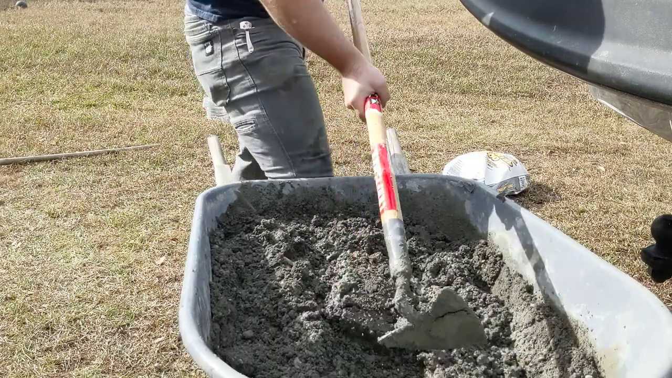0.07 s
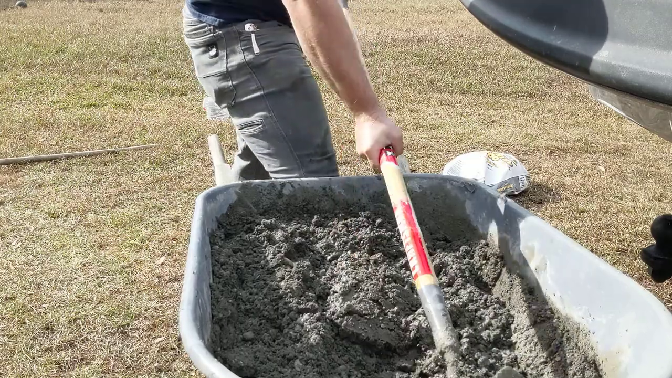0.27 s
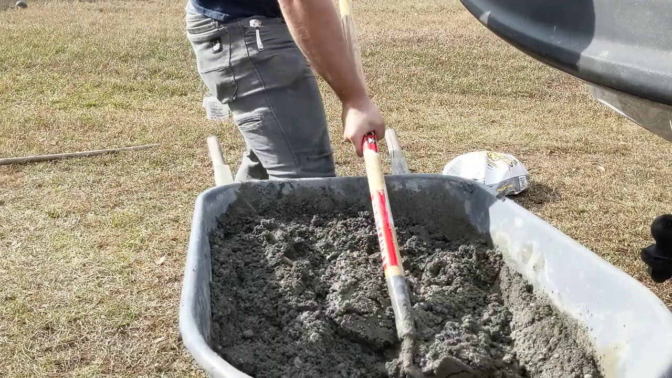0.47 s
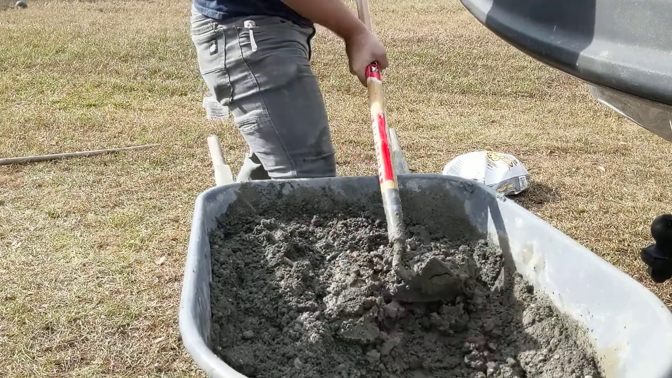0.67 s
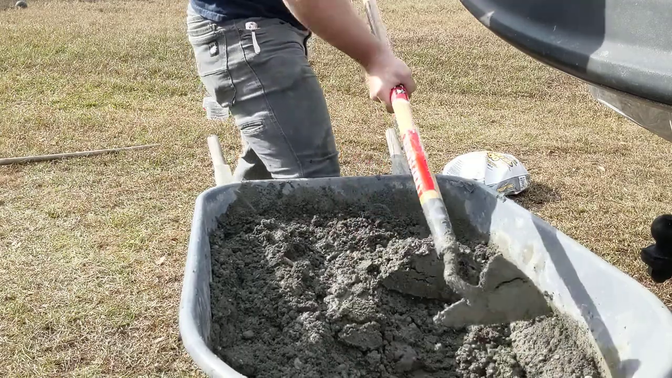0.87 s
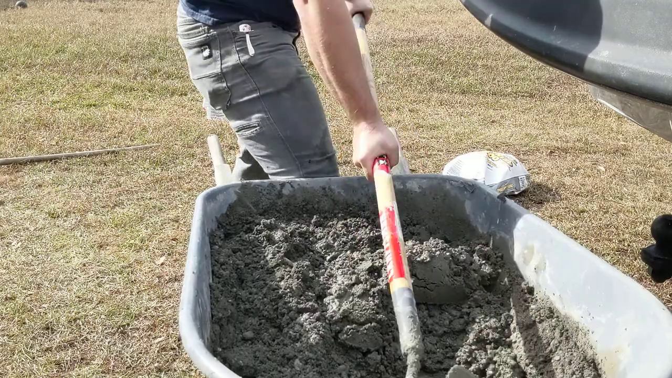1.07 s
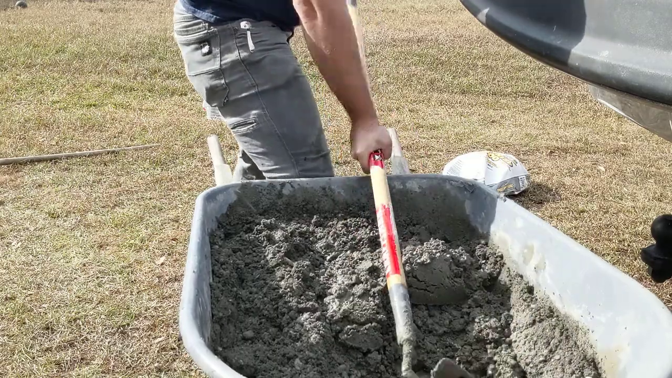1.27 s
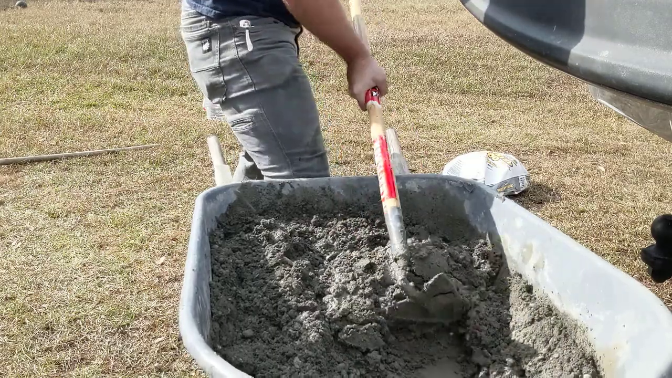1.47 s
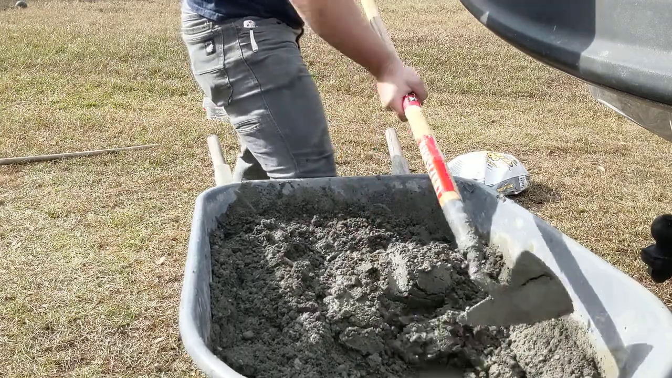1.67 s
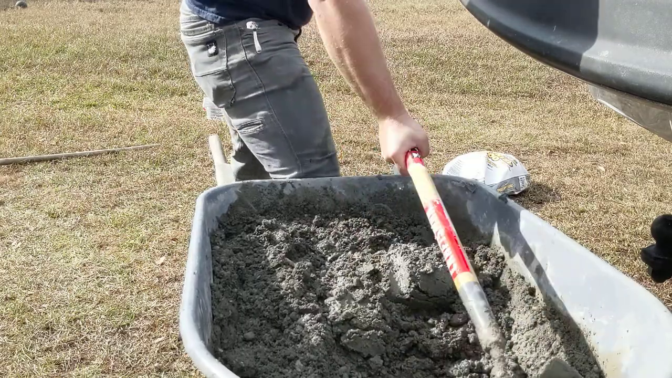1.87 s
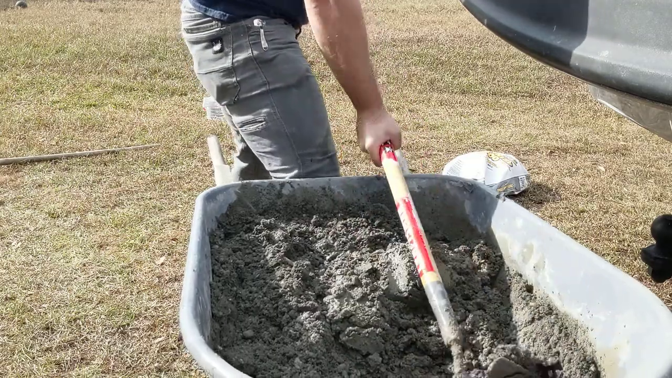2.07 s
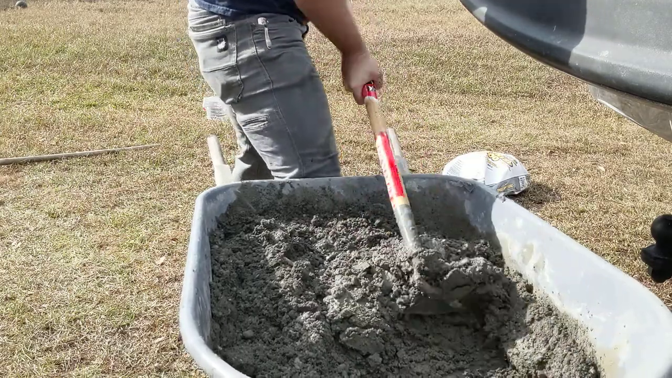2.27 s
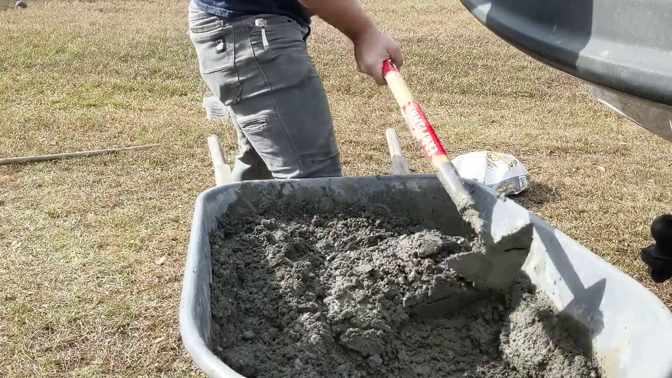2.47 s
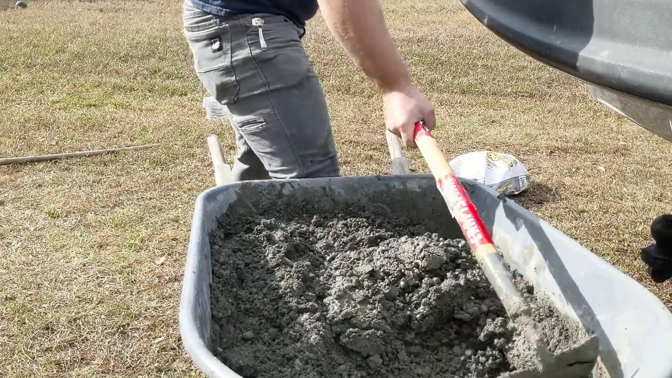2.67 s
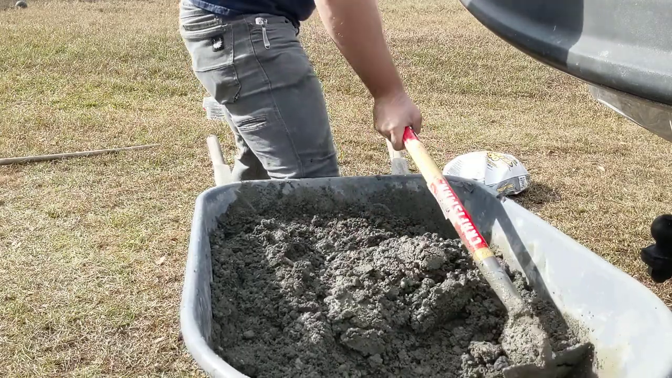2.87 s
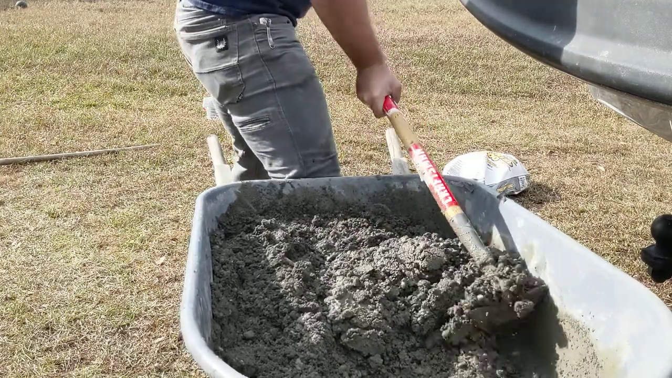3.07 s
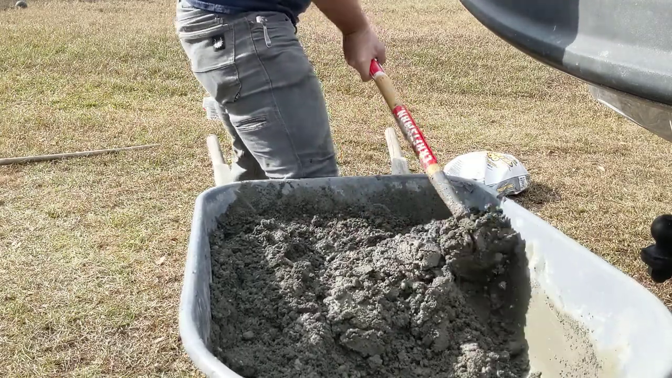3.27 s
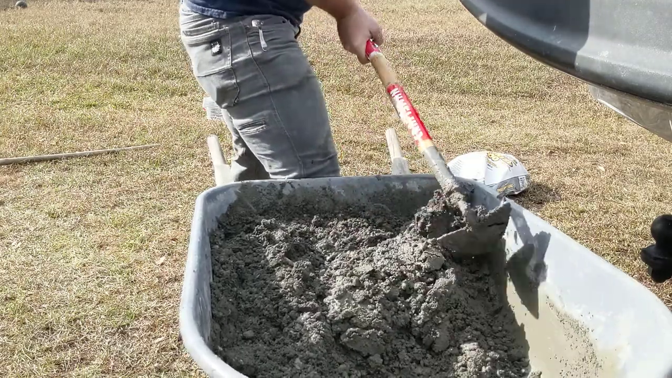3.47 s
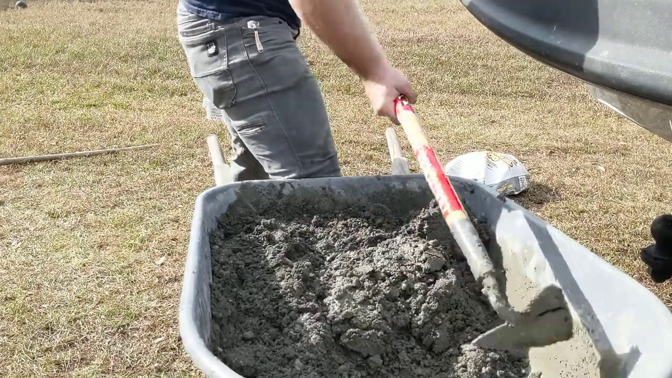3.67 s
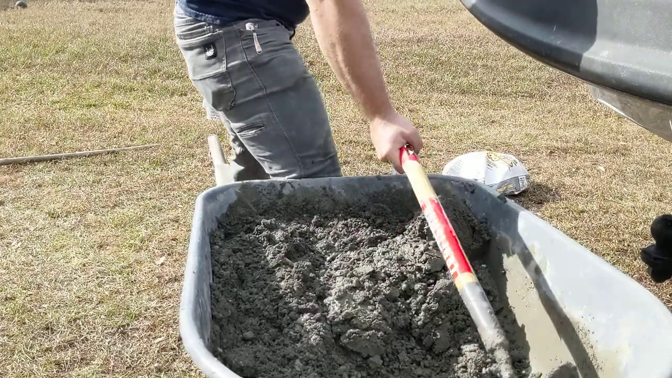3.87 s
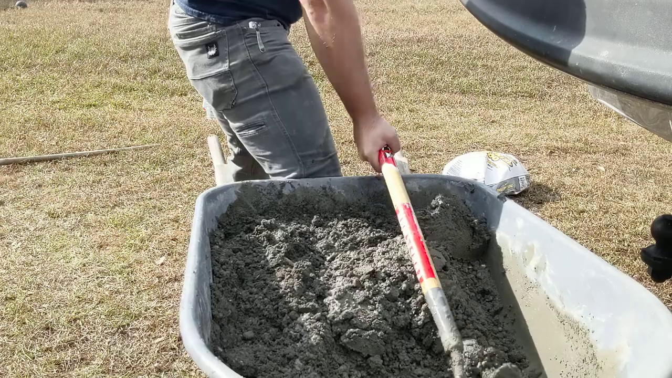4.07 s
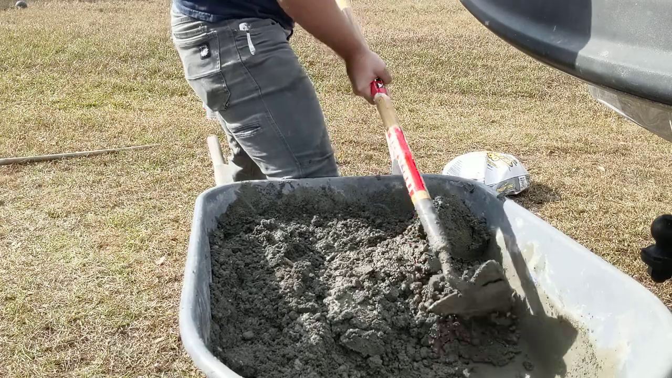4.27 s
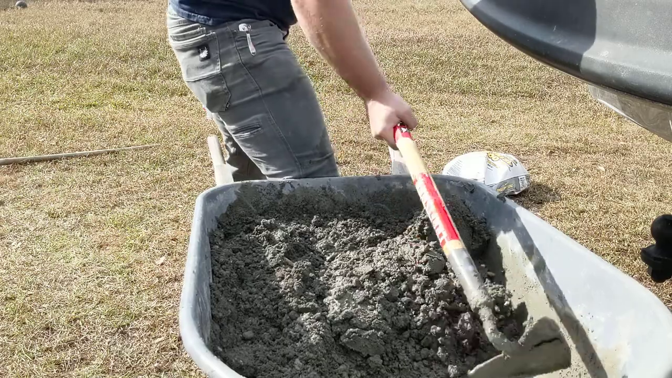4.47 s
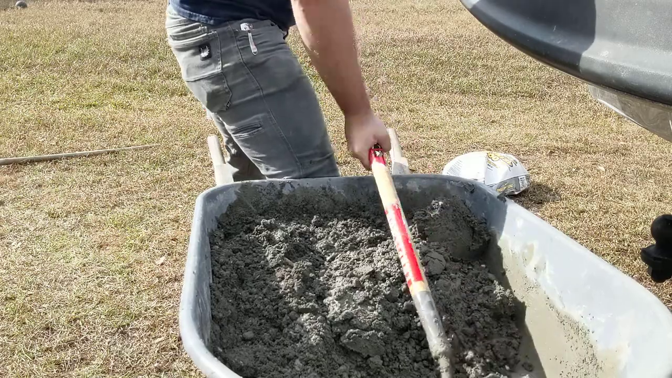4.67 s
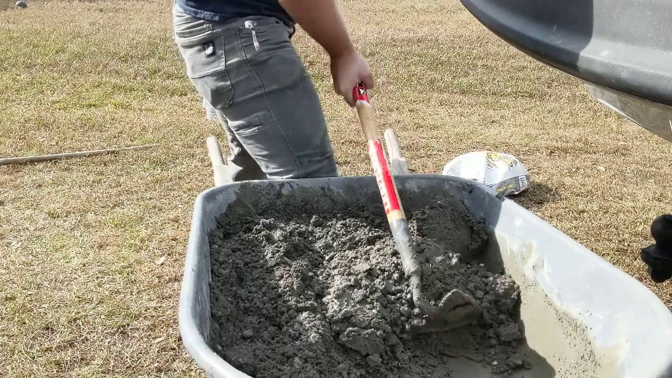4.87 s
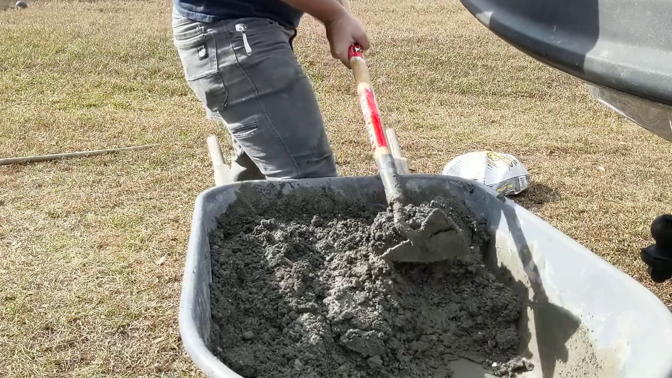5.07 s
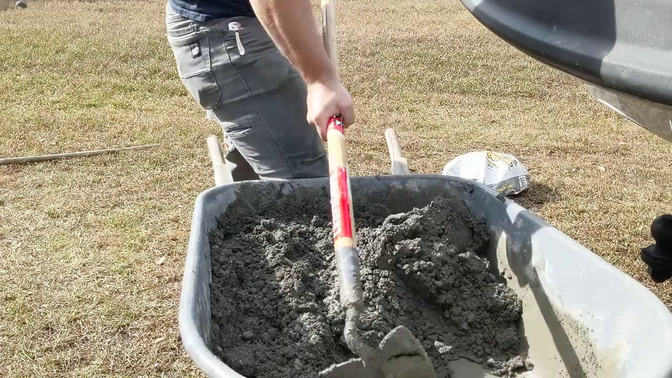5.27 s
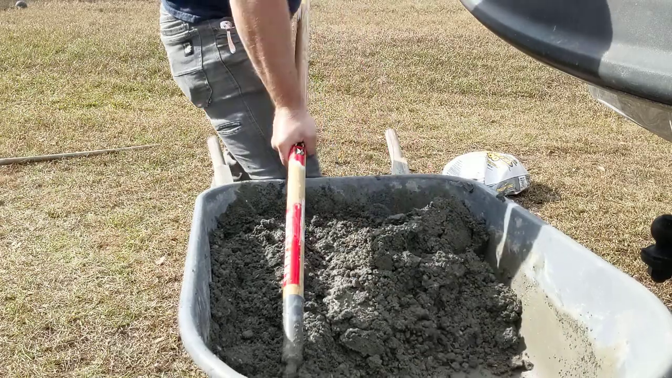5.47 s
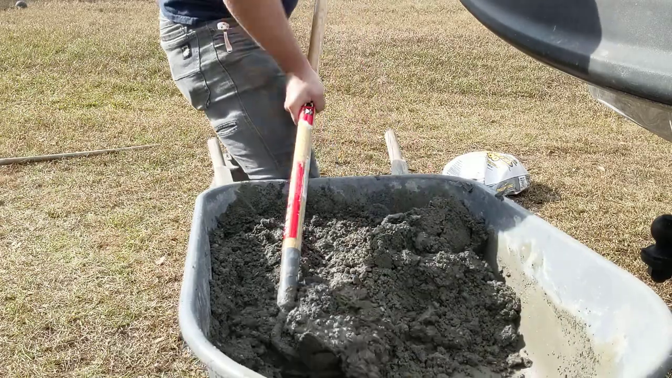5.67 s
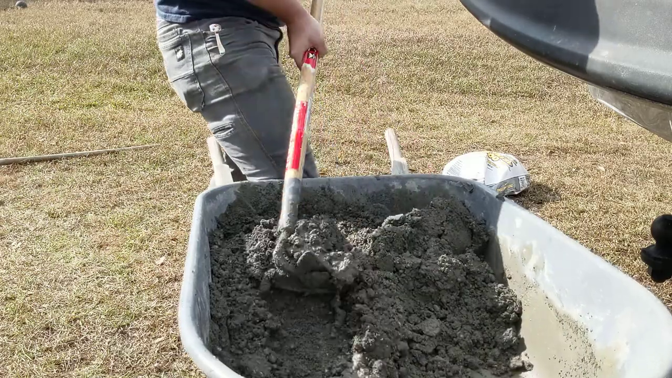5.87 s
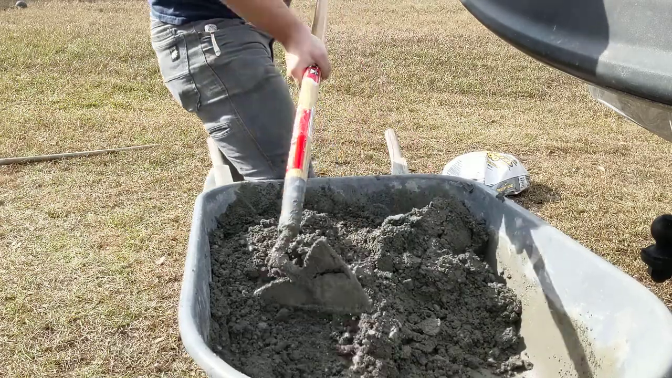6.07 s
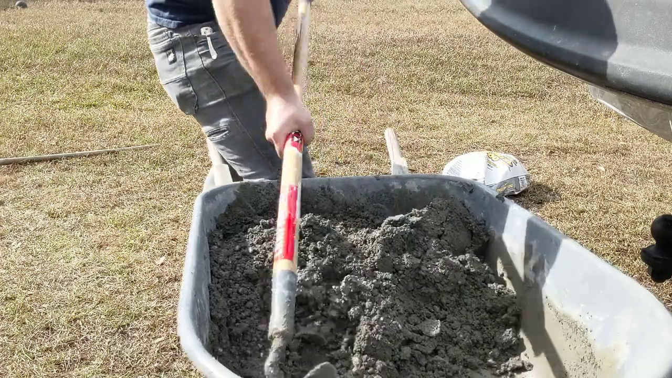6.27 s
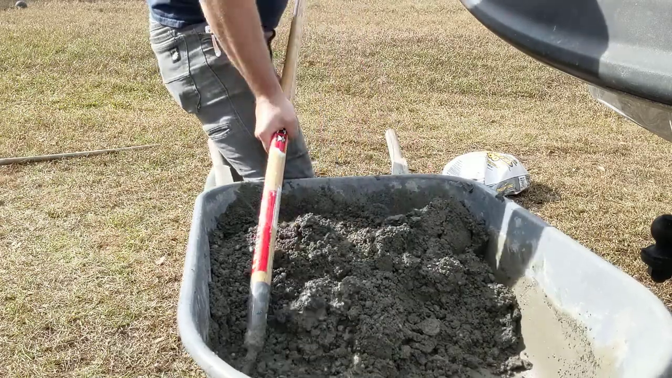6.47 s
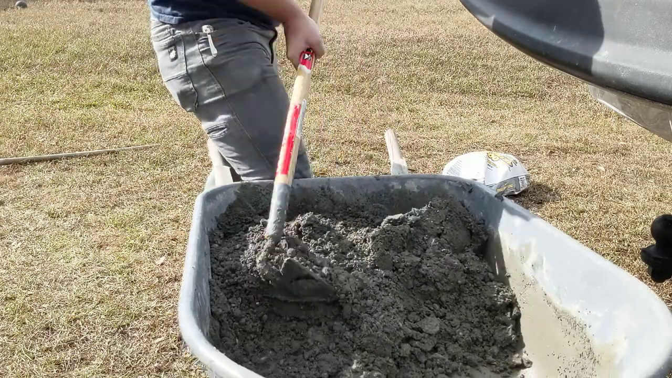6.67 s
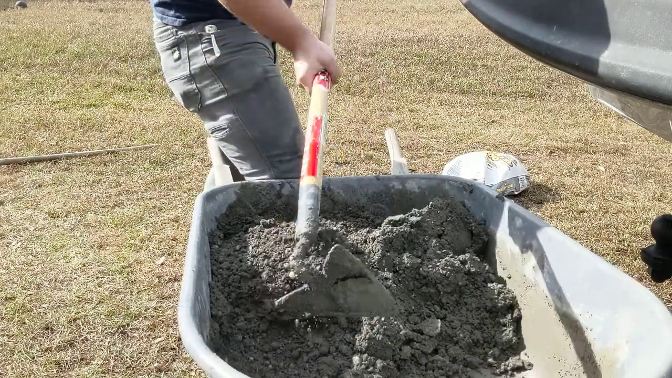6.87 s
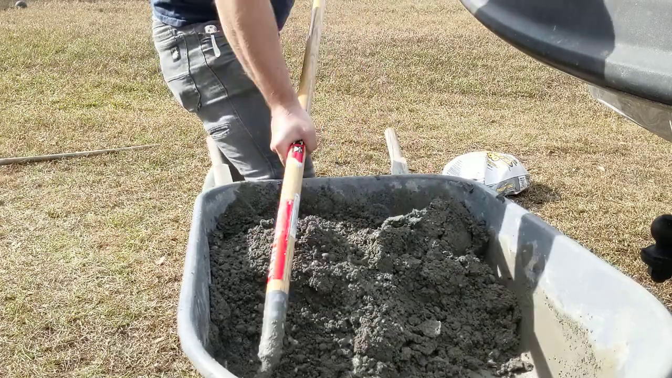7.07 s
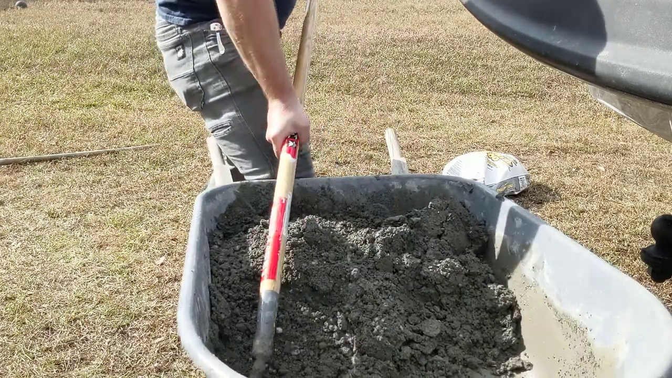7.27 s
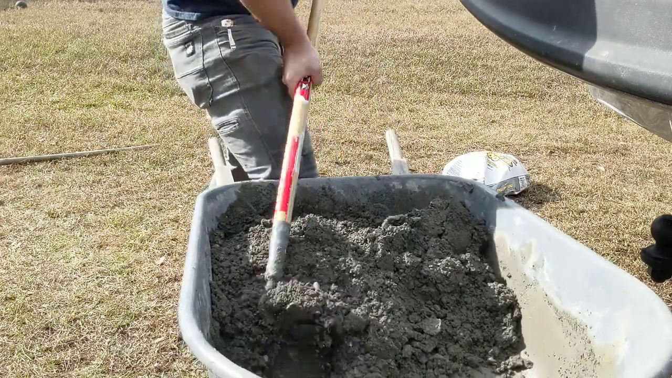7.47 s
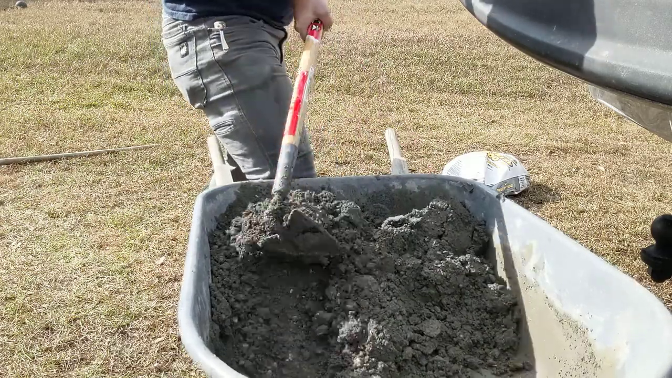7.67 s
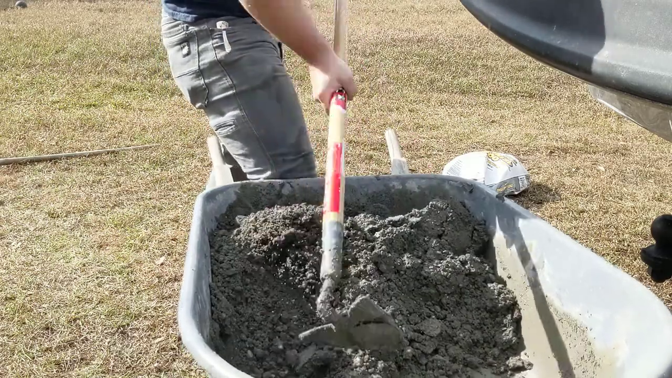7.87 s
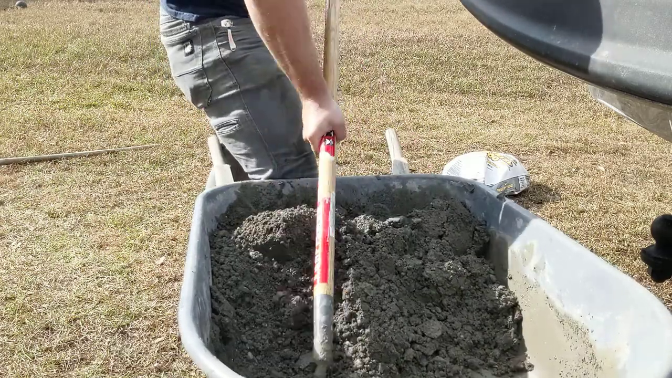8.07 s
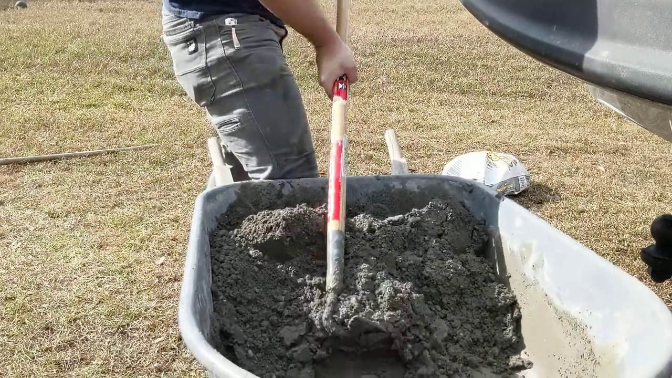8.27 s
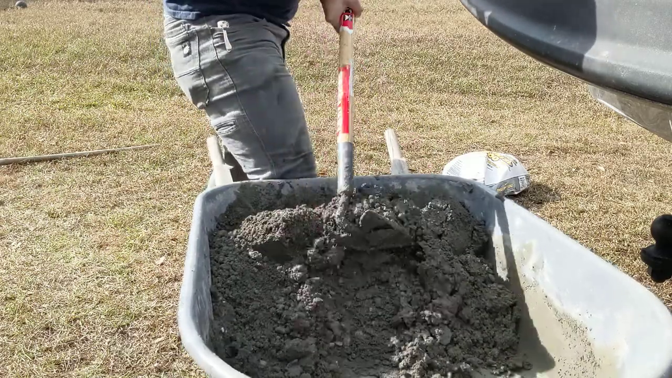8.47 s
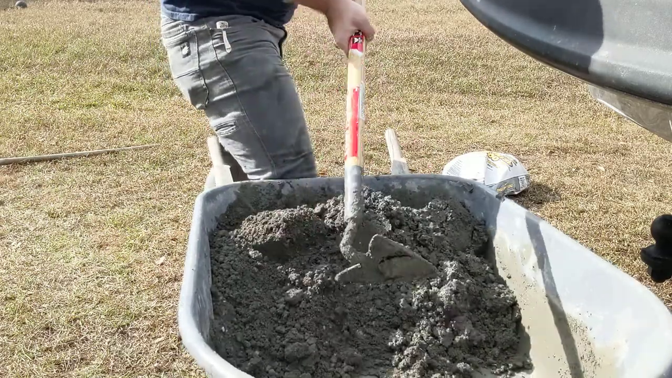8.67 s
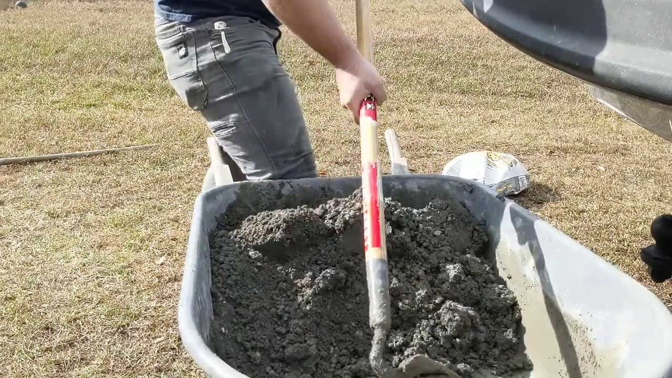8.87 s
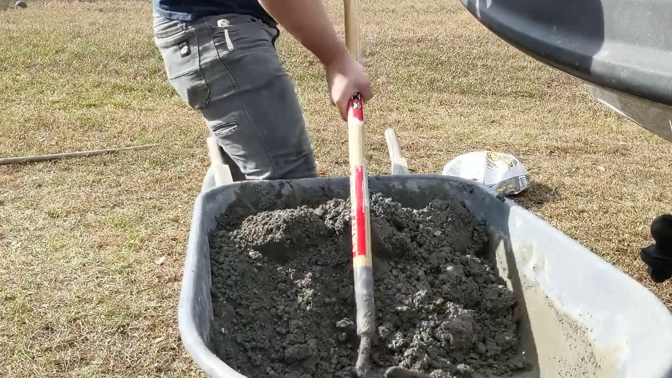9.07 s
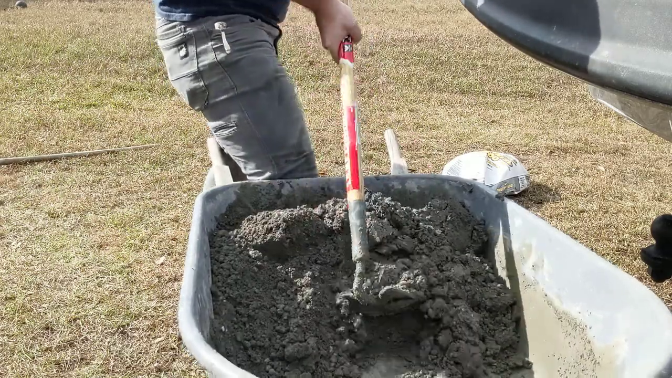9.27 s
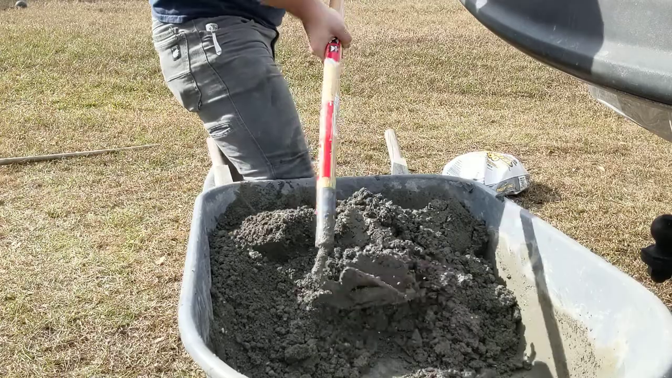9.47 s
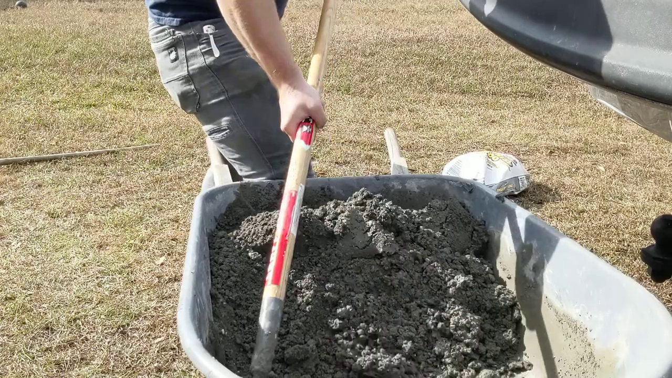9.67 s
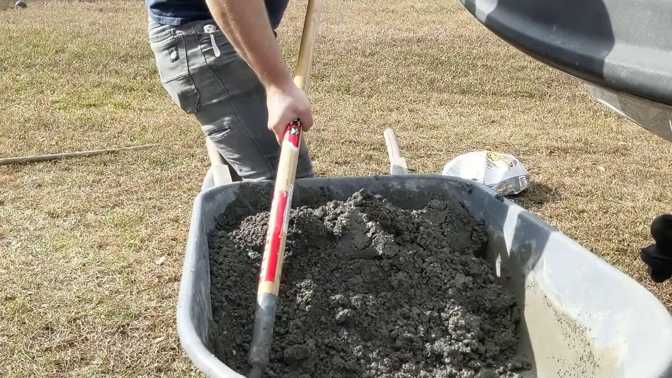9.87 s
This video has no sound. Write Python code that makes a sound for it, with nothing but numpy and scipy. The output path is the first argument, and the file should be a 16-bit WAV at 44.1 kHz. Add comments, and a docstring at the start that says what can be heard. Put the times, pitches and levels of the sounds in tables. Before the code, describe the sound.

A close stereo microphone in a quiet open yard, leaning left, with faint air, low hum and a light breeze. At 0.25 s a shovel cracks into stiff wet concrete, followed by clustered knocks, squelches and a gritty drag. Further strokes come at about 1.1, 1.8 and 2.75 s, the last long and grinding until 3.3 s, with wet pops and a dull boom from the plastic barrow. At 3.85 s a sharp bite leads to stony cracks around 4.1; the scrape at 4.6 is bright and strong, ending in a deep thump. Shorter strokes follow at 5.35, 6.25 and 7.05 s, with a heavy lump landing near 6.3 and a tiny distant chirp near 6.9. Crunchy pulls come at 8.0 and 9.0 s, a small gust around 8.85, then a final chop at 9.7 and short scrape at 9.9. Crumbs tick and settle between strokes.

```python
"""Open yard: a steel shovel chops into stiff wet concrete in a plastic wheelbarrow and drags it back, twelve strokes.
Sand, gravel and tub sound as noise grains, gated by push envelopes, convolved with body responses.
Air pockets squelch as sinking sines; the barrow booms as damped sines and its floor heaves as single pulses.
Between strokes the mix crumbles softly in fading grains. A 120 Hz hum, a light breeze with one gust and
one far chirp lie behind; decaying noise adds faint scatter from the yard."""
import sys
import numpy as np
from scipy import signal
from scipy.fft import rfft, irfft
from scipy.io import wavfile
from scipy.ndimage import uniform_filter1d, map_coordinates

SR = 44100
rng = np.random.default_rng(int(sys.argv[2]) if len(sys.argv) > 2 else 0)


def transcribe(u):
    """Save the signal u as a 16-bit wav file named by the first command-line argument.

    u: samples, shape (n,) or (channels, n), limited to [-1, 1]; the rate is SR.
    q: integer samples, one column per channel.
    """
    v = np.clip(np.atleast_2d(u).T, -1, 1)
    q = np.round(v * 32767).astype(np.int16)
    wavfile.write(sys.argv[1], SR, q)


N = 437913
T = np.arange(N) / SR
HZ = np.fft.rfftfreq(4096, 1 / SR)

# each stroke opens with a bite, then the blade sinks:
# (t/s, relative crack/dB, relative thud/dB, sinking time/s, relative sinking force/dB)
BITE_EVENTS = [(0.257, -13.5, -15, .06, -29.5), (1.065, -18, -30, 0.13, -26.5),
               (1.823, -17, -31, 0.0087, -31), (2.746, -15.5, -38, 0.027, -40),
               (3.856, -11.5, -18, 0.087, -29), (4.578, -18, -20, 0.048, -26),
               (5.351, -22, -32, 0.055, -31.5), (6.236, -24.5, -19, 0.036, -29),
               (7.058, -21.5, -23.5, 0.043, -25), (8.024, -19.5, -27.5, 0.024, -25.5),
               (9.007, -11, -28, .05, -27), (9.693, -12, -14, 0.02, -29)]
# the blade is pulled through the mix, once or more per stroke:
# (t/s, rise/s, hold/s, fall by 20 dB/s, then relative levels: sand on steel/dB, gravel crunch/dB, tub drumming/dB)
PULL_EVENTS = [(0.325, 0.026, 0.016, .07, -23, -23.8, -29.5), (0.415, .006, 0.08, 0.06, -29, -28, -30.5),
               (1.116, 0.048, 0.035, 0.0533, -24.5, -24.5, -29.5),
               (1.213, 0.011, .135, 0.07, -19.5, -24.5, -31.5),
               (1.865, .003, 0.03, 0.07, -29.5, -31.5, -34.5),
               (1.908, 0.046, 0.023, 0.0572, -22.5, -24, -27.5), (1.993, 0.17, 0.058, 0.05, -33, -34, -45),
               (2.771, .012, 0.069, 0.035, -21, -25.5, -28), (2.889, 0.0086, .16, 0.06, -27.5, -23.5, -27),
               (3.07, .03, .08, .09, -26.5, -22.8, -24.5), (3.228, 0.026, .045, .028, -31, -24, -25),
               (3.926, .05, 0.014, 0.06, -26, -28, -35.5), (4.057, 0.008, 0.09, 0.06, -27.5, -30, -34),
               (4.617, .012, 0.0089, 0.035, -22.5, -24.5, -30),
               (4.664, .006, .06, 0.05, -17.5, -23.5, -30.5),
               (4.749, 0.0091, .047, .025, -17.5, -20.5, -25.5),
               (5.389, 0.029, 0.011, 0.0442, -18, -21, -26.5), (5.44, 0.0054, 0.032, 0.1264, -40, -36, -36),
               (5.545, 0.0083, 0.033, 0.11, -48.5, -47.5, -45),
               (6.334, 0.041, 0.022, 0.0368, -22.5, -27, -26.5), (6.419, 0.009, 0.076, 0.02, -36, -33, -38),
               (7.135, 0.042, .013, 0.0665, -18.8, -20.5, -24.5),
               (7.27, 0.063, 0.054, .05, -30.5, -32.5, -32.5),
               (8.064, .006, 0.11, 0.0423, -20.8, -26.5, -29), (8.165, .015, .04, .04, -21.5, -23, -19.5),
               (9.018, .062, 0.08, 0.042, -19, -20.5, -22), (9.738, 0.018, 0.014, 0.05, -32, -36, -32),
               (9.836, .008, .06, .05, -38, -39.5, -43), (9.905, .022, .02, .05, -22, -28, -36)]


def amp(db):
    """Decibels to gain."""
    return 10 ** (np.asarray(db) / 20)


def evened(x):
    """Scales the mean of the channels to rms 1."""
    return x / np.sqrt(np.mean(np.atleast_2d(x).mean(0) ** 2) + 1e-20)


def read(points, hz=HZ):
    """Interpolates a spectrum on a log-frequency axis."""
    f, value = np.transpose(points)
    return np.interp(np.log(hz + 1), np.log(f), value)


def add(mix, s, sound):
    """Adds a sound in place at time s."""
    part = mix[..., max(round(s * SR), 0):][..., :sound.shape[-1]]
    part += sound[..., :part.shape[-1]]


def through(x, response):
    """Convolves each channel with a response."""
    return signal.oaconvolve(np.atleast_2d(x), np.atleast_2d(response), axes=1)[:, :N]


def causal(db):
    """Minimum-phase impulse response of a spectrum, energy 1."""
    log_gain = np.log(amp(np.r_[db, db[-2:0:-1]]))
    response = np.fft.ifft(np.exp(np.conj(signal.hilbert(log_gain)))).real
    return response / np.linalg.norm(response)


def wander(hz):
    """Smooth noise of rms 1, rolled off above the given rate."""
    f = np.fft.rfftfreq(N, 1 / SR)
    return evened(irfft(rfft(rng.standard_normal(N)) / (1 + (f / hz) ** 4), N))


def pair(a, b, same):
    """Two channels of the given correlation from two unrelated signals."""
    same = np.clip(same, 0, 1)
    return np.array([a, same * a + np.sqrt(1 - same ** 2) * b])


def grains(per_s, spread_db, same):
    """Steady random clicks, most small and a few large, partly alike in the two ears."""
    size = amp(spread_db * np.minimum(rng.exponential(1, N), 4))
    size = size * (rng.random(N) < per_s / SR)
    a, b = rng.choice([-1., 1.], (2, N))
    return evened(size * pair(a, b, same))


def shifting(x, depth_db, count=70, size=5):
    """Gaps between blade and paste open and close, so narrow resonances come and go."""
    hz, t, z = signal.stft(x, SR, nperseg=512, noverlap=384)
    field = rng.standard_normal((count, len(t)))
    field = uniform_filter1d(uniform_filter1d(field, size, axis=1), size, axis=0)
    band = np.sqrt(hz / hz[-1]) * (count - 1)  # resonances widen with frequency
    field = map_coordinates(field, np.meshgrid(band, np.arange(len(t)), indexing="ij"), order=1)
    gain = amp(depth_db * np.clip(field / field.std(), -2, 2))
    gain = gain / np.sqrt(np.mean(gain ** 2))
    return signal.istft(z * gain, SR, nperseg=512, noverlap=384)[1][:, :N]


def brighten(x, top_db):
    """Raises or lowers the treble above about 9 kHz."""
    highpass = signal.butter(3, 9000, "highpass", fs=SR, output="sos")
    return x + (amp(top_db) - 1) * signal.sosfiltfilt(highpass, x)


def outdoors():
    """Still air, a lumpy breeze with one gust and a distant electric hum."""
    # air spectrum: (f/Hz, relative level/dB)
    air_spectrum = [(12, -28), (20, 10), (120, -3), (168, -9), (607, -17.5), (3950, -25.5), (4940, -27),
                    (5680, -22), (6720, -28.5), (11800, -26), (16000, -35.5)]
    air = evened(through(pair(*rng.standard_normal((2, N)), same=0.69), causal(read(air_spectrum))))
    breeze = pair(wander(hz=49.5), wander(hz=48), same=1.0)
    breeze = evened(breeze * amp(4.8 * wander(hz=9)))
    gust_db = 8 * np.exp(-((T - 8.85) / .2) ** 2)
    hum = np.sin(2 * np.pi * 120 * T) * amp(1.26 * wander(hz=2.4))
    return amp(-57.3) * air + amp(gust_db - 62) * breeze + amp(-60) * hum


def chirp():
    """One faint, high, falling chirp far away: a sine in a Gaussian envelope."""
    u = np.clip((T - 6.895) / .035, -6, 6)
    pitch_hz = 5850 * (1 - .04 * u + .01 * wander(hz=300))
    return amp(-63) * np.exp(-u ** 2) * np.sin(2 * np.pi * np.cumsum(pitch_hz) / SR)


def yard(x):
    """Faint scatter from the surroundings, each band dying at its own speed."""
    # decay: (f/Hz, t60/s)
    yard_decay = [(500, 0.69), (3000, 0.65), (15000, 0.29)]
    hz, t, z = signal.stft(rng.standard_normal((2, SR)), SR, nperseg=256)
    early = 4.9 * np.exp(-t / 0.017)
    dying = amp(-60 * t / read(yard_decay, hz)[:, None]) + early
    onset = 1 - np.exp(-t / 0.002)
    tail = signal.istft(z * dying * onset, SR, nperseg=256)[1]
    return through(x, tail / np.linalg.norm(tail[0]))


def placed(x, lag_rad=0.78, lag_hz=380):
    """Louder on the left, reaching that ear later or sooner as the blade moves; its low middle lags."""
    # blade position: (t/s, lead of right ear/samples)
    ear_lead = [(1.3, 2.5), (2.9, 5), (4.7, 3.5), (6.2, -1), (9.1, -0.5), (9.9, 3)]
    # channel balance: (f/Hz, left minus right/dB)
    balance = [(100, 0.5), (300, 4), (1000, 5), (8000, 8), (13000, 11.5)]
    hz = np.fft.rfftfreq(N, 1 / SR)
    lead_samples = np.interp(T, *np.transpose(ear_lead))
    left = map_coordinates(x[0], [np.arange(N) - lead_samples], order=3)
    lean = amp(read(balance, hz))
    turn = np.exp(-1j * lag_rad * np.exp(-np.log((hz + 1) / lag_hz) ** 2))
    gains = 2 * np.array([lean * turn, np.ones_like(lean)]) / (1 + lean)
    return irfft(rfft(np.array([left, x[1]])) * gains, N)


def bodies():
    """Impulse responses of blade, gravel and plastic tub: coloured clicks, the tub with ringing modes."""
    # colours: (f/Hz, relative level/dB)
    sand_colour = [(1500, -22.5), (3000, -9), (4200, 2.5), (4900, -4), (6500, -4), (9000, -3.5),
                   (12500, -2), (15800, 0.5)]
    gravel_colour = [(300, -14), (600, -0.5), (950, 2.5), (1600, 3), (2600, -1), (3700, 1.5), (5000, -15),
                     (9000, -51.5)]
    tub_colour = [(40, -28.5), (100, -19), (170, -2.5), (300, 0), (480, 0), (620, -10), (900, -42),
                  (2500, -26.5)]
    # steel blade resonances: (f/Hz, width/Hz, height/dB)
    blade_modes = [(3260, 83, 4), (5690, 860, 9), (7510, 690, 5), (9550, 680, 5.5), (11880, 380, 6.5)]
    # loaded tub rings: (f/Hz, relative level/dB, t60/s)
    tub_modes = [(181.5, -26.5, 0.51), (269, -26.5, 0.17), (390.3, -17.5, 0.14), (764, -21, 0.087)]
    ridges_db = sum(db / (1 + (2 * (HZ - hz) / width) ** 2) for hz, width, db in blade_modes)
    t = np.arange(SR // 2) / SR
    rings = sum(amp(db - 60 * t / t60) * np.cos(2 * np.pi * hz * t) for hz, db, t60 in tub_modes)
    tub = amp(-20) * rings
    add(tub, 0, causal(read(tub_colour)))
    blade = causal(read(sand_colour) + ridges_db)
    gravel = causal(read(gravel_colour) + ridges_db)
    return blade, gravel, tub / np.linalg.norm(tub)


def slumps(blade, gravel, tub):
    """A falling lump lands as a soft Gaussian swell of grains on gravel and tub."""
    # lumps of wet mix: (t/s, gravel/dB, tub/dB)
    slump_events = [(2.39, -53, -71), (4.415, -52, -62), (5.82, -56.5, -52), (6.195, -42, -42),
                    (6.315, -35, -35), (6.61, -49.5, -51), (7.535, -52, -56), (8.505, -56, -49.5),
                    (9.42, -59.5, -52), (9.655, -46, -41)]
    width_s = .014
    patter, pat = sum(np.outer(amp(levels), np.exp(-((T - s) / width_s) ** 2))
                      for s, *levels in slump_events)
    on_gravel = through(patter * grains(per_s=1300, spread_db=3.5, same=0.8), gravel)
    on_tub = through(pat * grains(per_s=3900, spread_db=2.0, same=0.85), tub)
    return on_gravel + on_tub


def loose_mix():
    """How much mix is sliding: each pull stirs it up, a harder one more, then it comes to rest."""
    usual_db, per_crunch_db, usual_crunch_db, fade_db_per_s = -53, 0.17, -24, 24
    lift_s, lift_db = 0.29, -8.5  # stiller while the shovel is raised for the next bite
    level = np.zeros(N)
    for s, rise, hold, _, _, crunch_db, _ in PULL_EVENTS:
        since = T - (s + rise + hold)
        start_db = usual_db + per_crunch_db * (crunch_db - usual_crunch_db)
        db = start_db - fade_db_per_s * abs(since)
        level = np.maximum(level, amp(db) * (since > 0))
    raised = sum(np.clip((T - s + lift_s) / 0.15, 0, 1) * (T < s) for s, *_ in BITE_EVENTS)
    return level * amp(lift_db * raised)


def crumble(blade, gravel, tub):
    """Crumbs of wet mix slide off in uneven trickles and settle with tiny ticks and soft pats."""
    level = loose_mix() * amp(2.3 * wander(hz=21))
    fine = grains(per_s=7000, spread_db=0.0, same=0.29)
    sparse = grains(per_s=130, spread_db=6.0, same=0.37)
    ticks = level * (fine + 0.45 * sparse)
    pats = level * grains(per_s=29, spread_db=2, same=0.83)
    on_blade = brighten(through(ticks, blade), top_db=-4.5)
    on_gravel = through(ticks + pats / 2, gravel)
    return amp(1.8) * on_blade + amp(-2.5) * on_gravel + amp(-9.5) * through(pats, tub)


def squelches(fall=.17, rough=0.15):
    """A pocket in the paste rings briefly, its pitch sinking as the blade pulls it open."""
    # air pockets closing in the wet mix: (t/s, level/dB, f/Hz, length/s)
    pockets = [(0.305, -28, 490, .035), (0.365, -24, 450, .022), (0.508, -26, 800, .028),
               (2.905, -21, 1050, .016), (2.955, -25, 1250, .015), (3.082, -19, 291.6, 0.021),
               (3.295, -20.5, 540, 0.024), (3.995, -25, 450, .018), (4.157, -24, 910, 0.013),
               (4.64, -17, 360, .028), (4.727, -24, 960, .02), (5.425, -22, 1750, .016),
               (6.35, -24, 434.4, 0.022), (9.112, -21.5, 1190, 0.015), (9.163, -20, 300, 0.021)]
    out, wobble = np.zeros(N), wander(hz=300)
    for s, db, hz, length in pockets:
        near = abs(T - s) < 1.5 * length
        u = (T[near] - s) / length
        pitch_hz = hz * np.exp(-fall * u) * (1 + rough * wobble[near])
        turns = np.cumsum(pitch_hz) / SR
        out[near] += amp(db - 31 * u ** 2) * np.sin(2 * np.pi * turns)
    return out


def jolts():
    """The whole barrow flexes under a hard push: a deep, damped sine boom."""
    # booms: (t/s, level before the envelope/dB, f/Hz, decay to 1/e/s)
    booms = [(2.787, -21, 115, 0.018), (3.3, -31, 192.5, 0.07), (4.072, -27, 168, .036),
             (6.238, -27, 70, .018), (5.354, -15.5, 141.5, 0.011), (6.385, -28, 173.4, 0.066),
             (7.061, -21, 115, 0.016), (9.698, -27, 110, 0.02)]
    out, t = np.zeros(N), np.arange(SR // 2) / SR
    for s, db, hz, decay in booms:
        envelope = np.exp(-t / decay) * (1 - np.exp(-t * hz))
        add(out, s, amp(db) * np.sin(2 * np.pi * hz * t) * envelope)
    return out


def heaves(rise_s=.008, rebound_s=.042):
    """The tub floor bulges once under a heavy shove and creeps back: a deep thump without a ring."""
    # shoves: (t/s, relative level/dB)
    shoves = [(1.289, -29), (2.786, -26), (4.071, -25), (4.769, -19.5), (6.39, -31), (9.693, -26)]
    out, t = np.zeros(N), np.arange(SR // 2) / SR
    bulge = (1 - np.exp(-(t / rise_s) ** 2)) * (1 - t / rebound_s) * np.exp(-t / rebound_s)
    for s, db in shoves:
        add(out, s, amp(db) * bulge)
    return 2 * out


def chops(blade, gravel, tub, length_s=0.0105, rise_s=0.00045, sharp=.5):
    """Each blow crushes a brief cluster of grains, longer the harder it is, and pushes once on the tub."""
    # the blade taps the mix or catches a stone, or a clod drops: (t/s, relative crack/dB, relative thud/dB)
    knocks = [(0.42, -13.5, -39), (0.457, -17, -20.5), (0.475, -20, -52.5), (0.892, -44.5, -61),
              (0.985, -24, -28.5), (1.107, -14.5, -17.5), (1.134, -19, -30), (1.385, -17.5, -35),
              (1.76, -24, -31), (1.906, -15, -29), (2.208, -25, -26), (2.228, -25, -38),
              (2.629, -30.5, -42), (2.898, -16, -24), (3.04, -17, -24), (3.219, -19, -22), (3.47, -34, -31),
              (3.766, -36.5, -36), (3.986, -17, -32), (4.067, -10.5, -26), (4.108, -14.5, -37),
              (4.14, -19, -42), (4.151, -16, -32), (4.547, -30, -40), (4.665, -12, -19), (6.191, -28, -33),
              (6.298, -24, -29), (6.336, -15, -36), (6.383, -12, -43), (7.134, -22, -25),
              (7.37, -18.5, -43), (7.903, -39, -60), (7.979, -32.5, -59), (8.605, -41.5, -38.5),
              (9.349, -38.5, -60), (9.614, -36, -35)]
    crack, push, t = np.zeros(N), np.zeros(N), np.arange(SR // 10) / SR
    for s, crack_db, thud_db, *_ in BITE_EVENTS + knocks:
        u = t / (length_s * amp(0.17 * (crack_db + 8)))
        burst = (1 - np.exp(-t / rise_s)) * (np.exp(-u ** 2) + 0.27 * np.exp(-u / 2))
        add(crack, s, amp(crack_db) * burst)
        add(push, s + 0.00197, amp(thud_db) * np.exp(-t / 0.000094))
    bright = through(crack * grains(per_s=13000, spread_db=5.5, same=0.41), blade)
    bright = signal.lfilter([1, -sharp], [1], bright)  # cracking grains are sharper than sliding ones
    dull_grains = shifting(grains(per_s=11000, spread_db=1.0, same=0.76), depth_db=5, count=140)
    dull = through(crack * dull_grains, gravel)
    return amp(-7.5) * bright + amp(-10.5) * dull + amp(3.5) * through(push, tub)


def push_db(t, rise, hold, fall):
    """One push of the arms: the force builds from -13 dB, holds and dies away by 20 dB per fall time."""
    return -13 * np.clip(1 - t / rise, 0, 1) - 20 * np.maximum(t - rise - hold, 0) / fall


def forces():
    """Force on sand, gravel and tub: the blade sinks after each bite, then it is pulled."""
    # sinking is dull: (sand/dB, gravel/dB, tub/dB)
    sink_colour_db = (-11.5, -8, -0.5)
    # change over a pull as the mix heaps up before the blade: (sand/dB, gravel/dB, tub/dB)
    heap_db = (-4, 0, 1.5)
    # added to the fall time; stones and tub fall silent later than the blade: (sand/s, gravel/s, tub/s)
    settle_s = (0, 0.0094, 0.013)
    sink_rise_s, sink_fall_s = 0.0018, 0.054
    power, t = np.zeros((3, N)), np.arange(SR) / SR
    for s, _, _, length, db in BITE_EVENTS:
        push = push_db(t, sink_rise_s, length, sink_fall_s)
        add(power, s, amp(db + np.array(sink_colour_db)[:, None] + push) ** 2)
    for s, rise, hold, fall, *levels in PULL_EVENTS:
        heap = np.clip(t / (rise + hold), 0, 1) - .5
        push = push_db(t, rise, hold, fall + np.array(settle_s)[:, None])
        add(power, s, amp(np.array(levels)[:, None] + np.outer(heap_db, heap) + push) ** 2)
    return uniform_filter1d(np.sqrt(power), size=120, axis=1)


def jerks():
    """Lumps give way one by one: each break is a sudden surge that dies within milliseconds."""
    breaks = abs(grains(per_s=90, spread_db=1.8, same=1)[0])
    return evened(signal.lfilter([1], [1, -np.exp(-1 / (.0035 * SR))], breaks))


def pebbles(per_s, cycles, count=24):
    """Stones knock together, each size a short damped sine of its own pitch."""
    clicks = grains(per_s, spread_db=4.0, same=0.76)
    size = rng.integers(0, count, N)
    t, out = np.arange(2048) / SR, np.zeros((2, N))
    for k, hz in enumerate(np.geomspace(520, 3900, count)):
        ring = np.sqrt(hz) * np.sin(2 * np.pi * hz * t) * np.exp(-hz * t / cycles)
        out += through(clicks * (size == k), ring)
    return evened(out)


def scrape(blade, gravel, tub):
    """The dragged blade sticks and slips; each slip shakes sand, stones and tub together."""
    fizz_per_db, usual_sand_db = .25, -26  # sand pressed harder on the steel fizzes brighter
    sand, crunch, drum = forces()
    slips = evened(amp(1.95 * wander(hz=70.0) + 0.74 * wander(hz=354)))
    lumps = jerks()
    fine, coarse = evened(slips + lumps / 6), evened(slips + lumps / 2)

    sand_grains = shifting(grains(per_s=12000, spread_db=4.5, same=0.21), depth_db=4, count=160)
    hiss = through(sand * fine * sand_grains, blade)
    sand_db = 20 * np.log10(abs(sand) + 1e-9)
    hiss = brighten(hiss, fizz_per_db * (sand_db - usual_sand_db))

    gravel_grains = shifting(grains(per_s=4000, spread_db=2.0, same=0.85), depth_db=3.8, count=160)
    grit = through(crunch * coarse * gravel_grains, gravel)
    snaps = through(sand * grains(per_s=70, spread_db=3.5, same=0.45), blade)  # grains crack under the edge
    stones = crunch * slips * pebbles(per_s=450, cycles=13)

    tub_grains = shifting(grains(per_s=2000, spread_db=2.5, same=0.9), depth_db=2.5, count=120)
    rumble = through(drum * coarse * tub_grains, tub)
    on_steel = amp(-0.03) * hiss + amp(-11) * snaps
    return on_steel + amp(-2.5) * grit + amp(-5.5) * stones + amp(-1.73) * rumble


def scene():
    """All the shovel's sounds at the barrow, in the open yard."""
    parts = bodies()
    mix_sounds = slumps(*parts) + crumble(*parts) + squelches()
    work = placed(mix_sounds + chops(*parts) + scrape(*parts))
    return outdoors() + chirp() + amp(-15.5) * yard(work) + jolts() + heaves() + work


def record(dry):
    """The microphone rounds off the highest peaks; then its band limit, 20 Hz to 16 kHz."""
    dry = dry / (1 + (dry / .85) ** 4) ** .25
    dry = signal.sosfilt(signal.butter(2, 20, "highpass", fs=SR, output="sos"), dry)
    lowpass = signal.firwin(401, 16000, window=("kaiser", 8), fs=SR)
    return signal.oaconvolve(dry, lowpass[None], "same")


dry = scene()
out = record(dry)
transcribe(out)
```